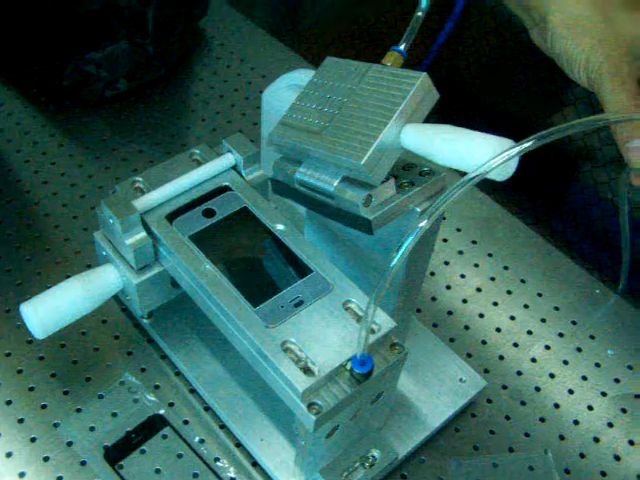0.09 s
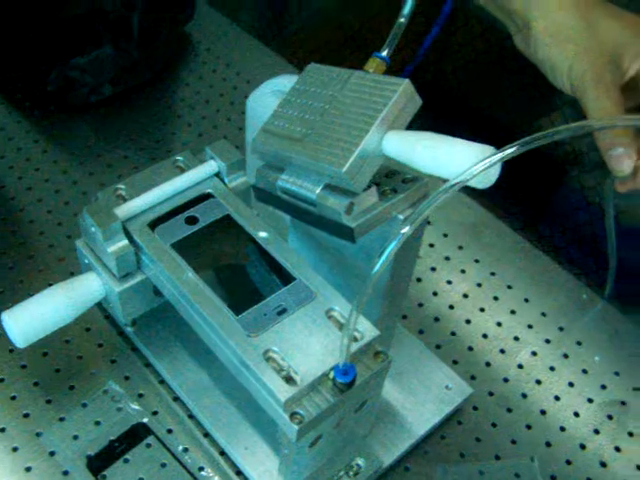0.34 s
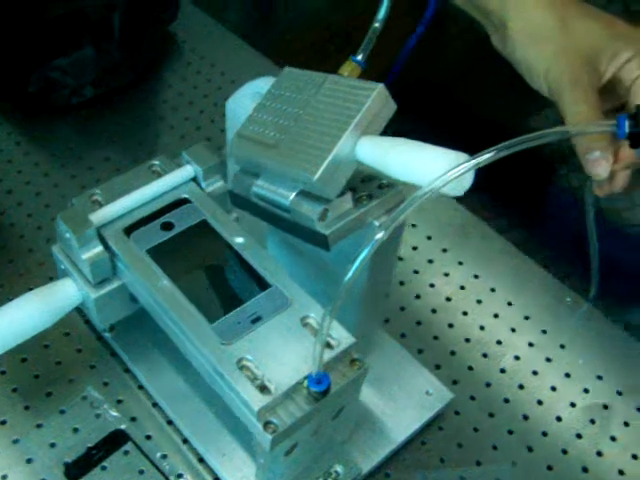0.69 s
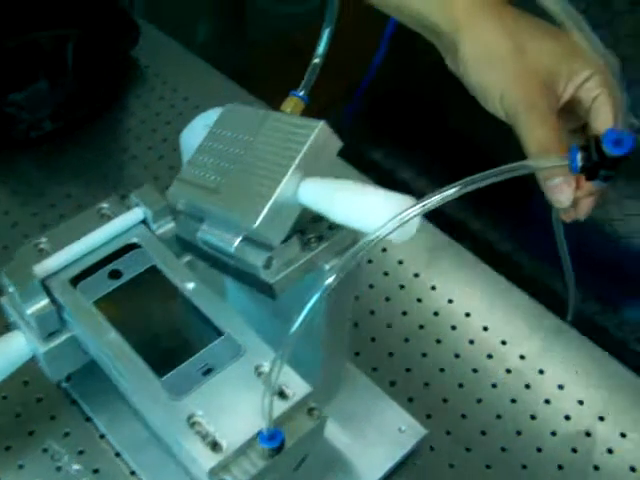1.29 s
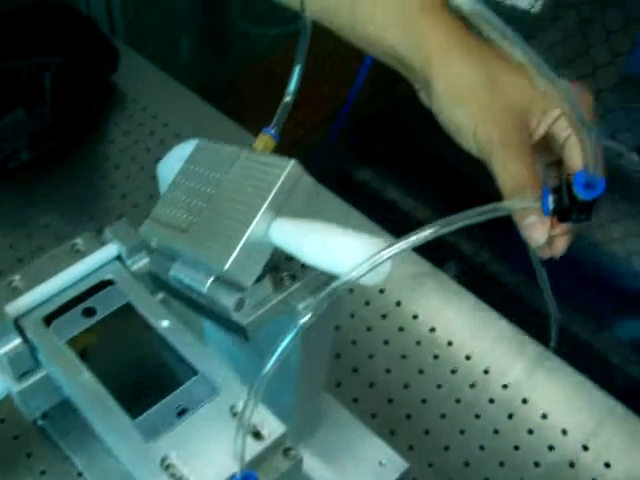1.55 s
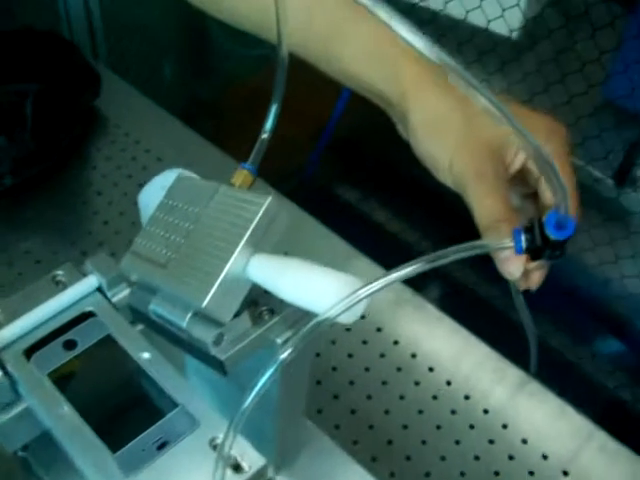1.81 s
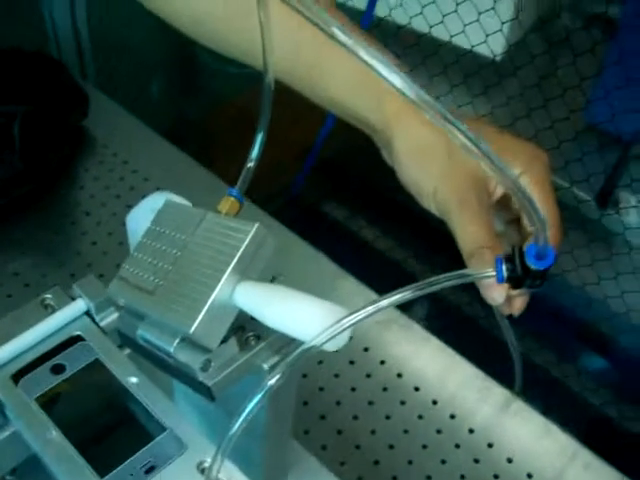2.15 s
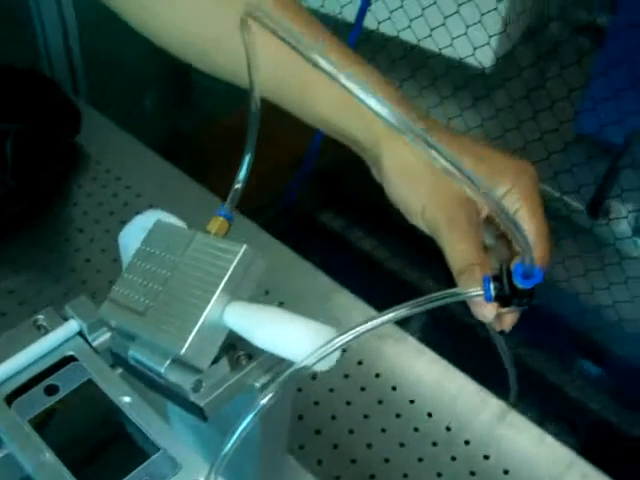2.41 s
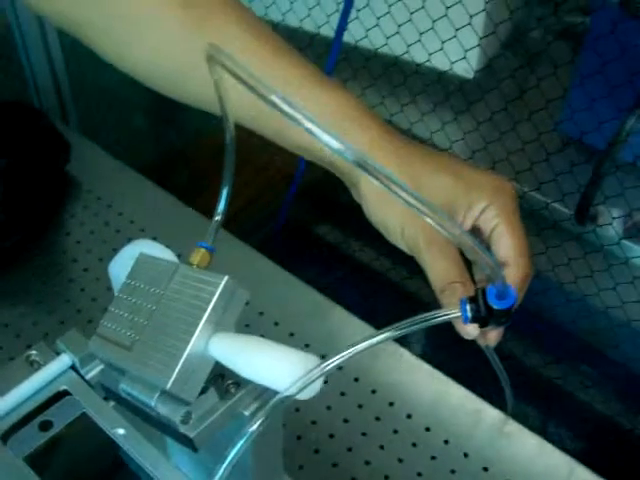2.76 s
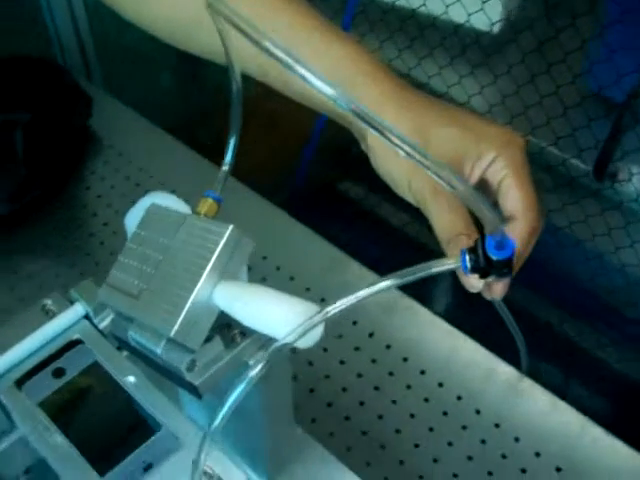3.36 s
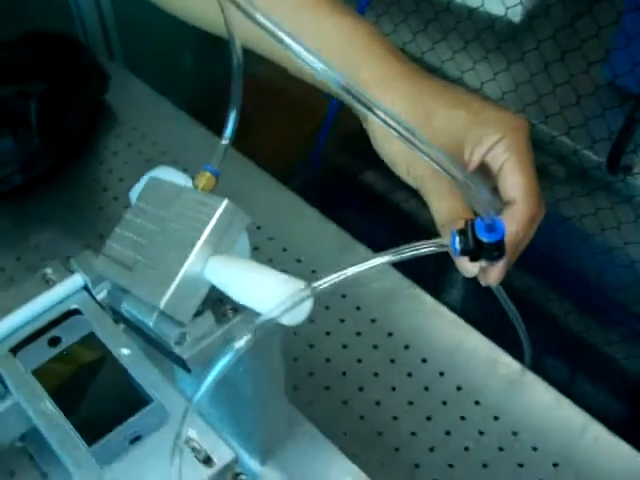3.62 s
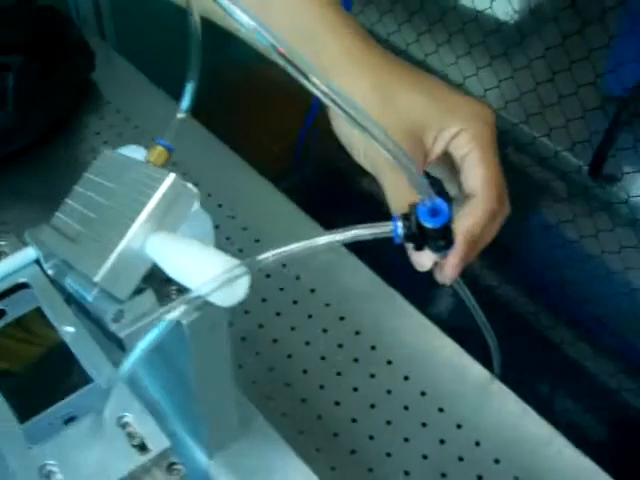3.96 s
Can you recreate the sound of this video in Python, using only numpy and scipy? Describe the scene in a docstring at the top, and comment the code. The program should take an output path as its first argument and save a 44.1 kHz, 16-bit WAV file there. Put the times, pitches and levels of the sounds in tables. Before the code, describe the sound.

Steady workshop ventilation noise fades up after a short silence, starting at about 0.4 seconds and reaching full level by 0.8. It is a low, fluttering rumble with a slightly wavering motor hum and an even hiss of air. A tiny, dry click, like a plastic air valve, sounds close by at about 1.4 seconds, and a fainter one at 3.3. The noise continues unchanged to the end.

```python
"""Workshop bench with a pneumatic jig

Turbulent ventilation rumbles and rings its ducts, a motor hums and moving air hisses evenly.
Two tiny, dry clicks sound close by, probably from a hand-held plastic air valve: each is a light
touch, then a snap that excites damped modes. After a short silence the sound fades up,
and little passes above 8 kHz."""
import sys
import numpy as np
from scipy import signal
from scipy.fft import rfft, irfft
from scipy.io import wavfile
from scipy.ndimage import uniform_filter1d

SR = 44100
rng = np.random.default_rng(int(sys.argv[2]) if len(sys.argv) > 2 else 0)


def bounce(signal):
    """Save signal as a 16-bit WAV file at the path given by the first command-line argument."""
    frames = np.transpose(np.atleast_2d(signal))
    limited = np.clip(frames, -1, 1)
    pcm = np.round(limited * 32767).astype(np.int16)
    wavfile.write(sys.argv[1], SR, pcm)


N = 176400


def undb(db):
    """Amplitude ratio of a level in decibels."""
    return 10 ** (np.asarray(db) / 20)


def at_level(x, db):
    """Normalisation to an rms level in dB re full scale."""
    return x * undb(db) / np.sqrt(np.mean(x ** 2))


def wander(rate_hz):
    """Slow random modulation: random steps smoothed by two moving averages, with a spread near 1."""
    hold = max(int(SR / rate_hz), 2)
    steps = rng.standard_normal(N)[np.arange(N) // hold]
    return 1.3 * uniform_filter1d(uniform_filter1d(steps, hold), hold)


def filtered_noise(response):
    """Linear filtering: the spectrum of white noise is multiplied by a frequency response."""
    hz = np.maximum(np.arange(N // 2 + 1) * SR / N, 1)
    return irfft(rfft(rng.standard_normal(N)) * response(hz), N)


def coloured_noise(spectrum):
    """Spectral shaping: the envelope joins (f/Hz, level/dB) points over log frequency."""
    corner_hz, db = np.array(spectrum).T
    return filtered_noise(lambda hz: undb(np.interp(np.log(hz), np.log(corner_hz), db)))


def damped_mode(age, hz, t60):
    """Free vibration: a sinusoid that starts at the impact and decays by 60 dB in t60 seconds."""
    age = np.maximum(age, 0)
    return np.sin(2 * np.pi * hz * age) * np.exp(-np.log(1000) * np.minimum(age / t60, 10))


def ventilation():
    """Turbulence makes a fluttering rumble; the flow drives ducts and housings into resonance."""
    # spectrum of the turbulence: f/Hz, relative density level/dB
    rumble_spectrum = [(20, -17.5), (30, -7), (45, -14.5), (65, -6.5), (100, 0), (130, -0.5), (185, 0.5),
                       (230, -3), (300, -3.5), (370, -4.5), (480, -7), (620, -7), (800, -16), (1200, -27.5),
                       (2500, -53.5)]
    # resonances of ducts and housings: f/Hz, half-power bandwidth/Hz, rms level/dB
    duct_modes = [(100.6, 7, -39.5), (124.2, 7, -39), (300.6, 7, -41), (440.7, 6, -41), (472, 4.6, -44),
                  (502.2, 8.4, -46)]
    rumble = coloured_noise(rumble_spectrum)
    flutter_db = wander(rate_hz=9.02)
    ducts = np.zeros(N)
    for centre, width, db in duct_modes:
        resonance = filtered_noise(lambda hz: 1 / (1 + 1j * (hz / centre - centre / hz) * centre / width))
        ducts += at_level(resonance, db)
    return at_level(rumble * undb(flutter_db), db=-26) + ducts


def motor_hum():
    """Periodic vibration radiates one tone, slowly modulated in frequency and amplitude."""
    pitch_hz = 199 * (1 + 0.00942 * wander(rate_hz=6))
    phase = 2 * np.pi * np.cumsum(pitch_hz) / SR
    waver_db = 2.5 * wander(rate_hz=4.1)
    return at_level(np.sin(phase) * undb(waver_db), db=-36)


def air_hiss():
    """Flow noise: moving air radiates a broadband hiss of almost constant level."""
    # spectrum of the flow noise: f/Hz, relative density level/dB
    hiss_spectrum = [(300, -15), (800, -1), (1150, -1), (1450, 0), (1750, -1.5), (2000, -5.5), (2250, -2.5),
                     (2700, -4), (3500, -3), (4400, -6), (5100, -8), (5800, -11), (6400, -15.5),
                     (7100, -18.5), (7700, -25), (8200, -37.5)]
    hiss = coloured_noise(hiss_spectrum)
    flutter_db = 0.1 * wander(rate_hz=9)
    return at_level(hiss * undb(flutter_db), db=-29.5)


def valve_clicks(t):
    """Impact excitation: the part touches lightly, then snaps home and its modes ring for milliseconds."""
    # clicks: onset t/s, gain level/dB
    clicks = [(1.4186, -9), (3.2904, -13.5)]
    # modes of the snapping part: f/Hz, relative level/dB, 60 dB decay time t/s
    snap_modes = [(3420, -11, 0.015), (4500, -18, .009), (5530, 2, 0.0074), (5900, 4.5, 0.0046),
                  (6500, -10, 0.0049)]
    snap_delay_s, snap_rise_s = 0.00041, 0.00035
    out = np.zeros(N)
    for onset, click_db in clicks:
        touch = undb(-2.5) * damped_mode(t - onset, hz=3920, t60=0.0028)
        snap_age = np.maximum(t - onset - snap_delay_s, 0)
        attack = 1 - np.exp(-snap_age / snap_rise_s)
        ringing = sum(undb(db) * damped_mode(snap_age, hz, t60) for hz, db, t60 in snap_modes)
        out += undb(click_db) * (touch + attack * ringing)
    return out


def scene():
    """Superposition: steady room machinery and the two close clicks add in one channel."""
    t = np.arange(N) / SR
    return (ventilation() + motor_hum() + air_hiss() + valve_clicks(t))[None]


def record(dry):
    """Gating and band limiting: the gain opens, rises linearly in dB and feeds an elliptic low-pass."""
    open_s, fade_s, opening_db, cutoff_hz = 0.37, 0.45, -26.5, 8100
    age = np.arange(N) / SR - open_s
    fade = (age > 0) * undb(opening_db * np.clip(1 - age / fade_s, 0, 1))
    low_pass = signal.ellip(10, rp=0.2, rs=80, Wn=cutoff_hz, fs=SR, output="sos")
    return signal.sosfilt(low_pass, dry * fade)


dry = scene()
out = record(dry)
bounce(out)
```